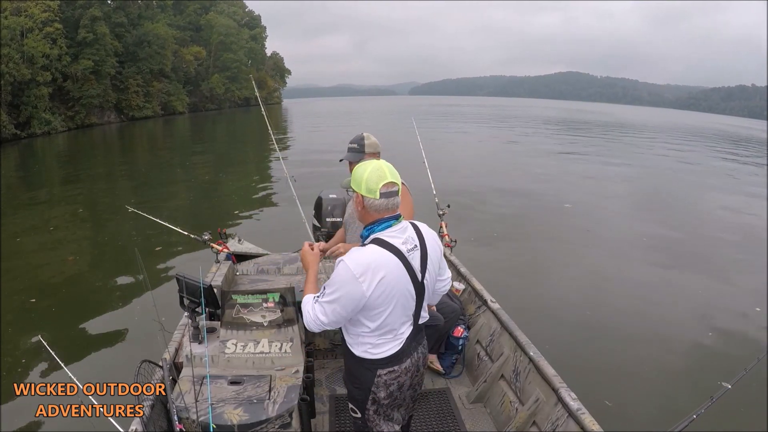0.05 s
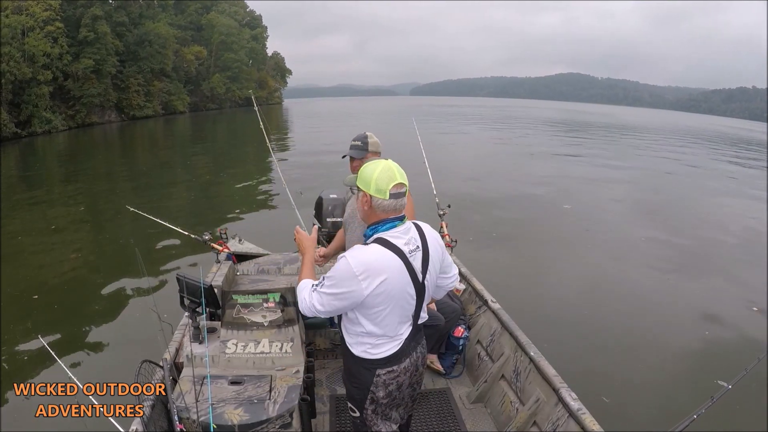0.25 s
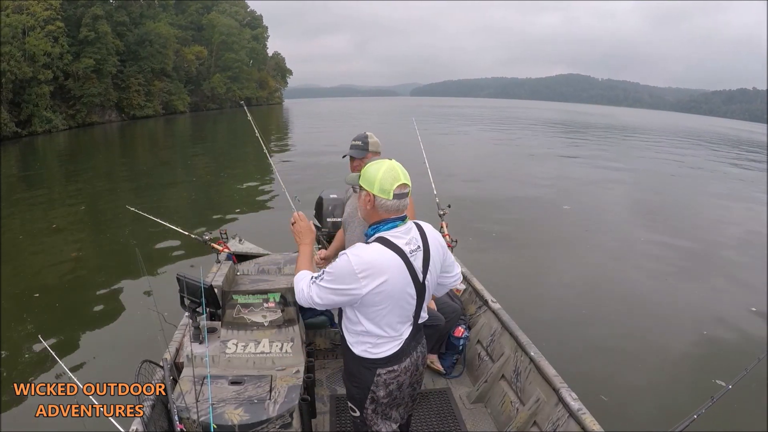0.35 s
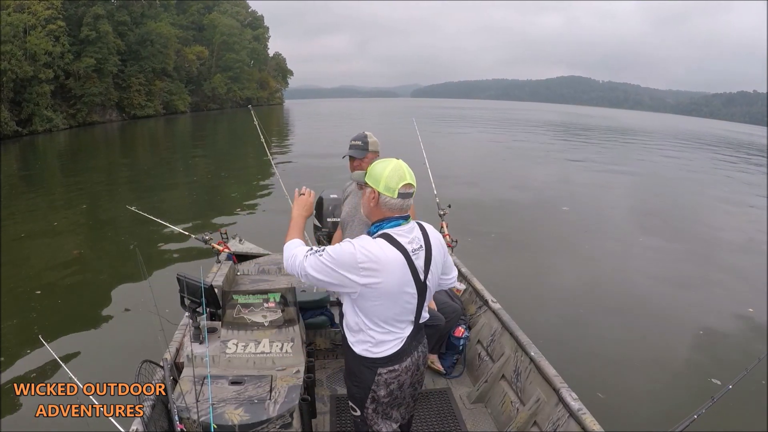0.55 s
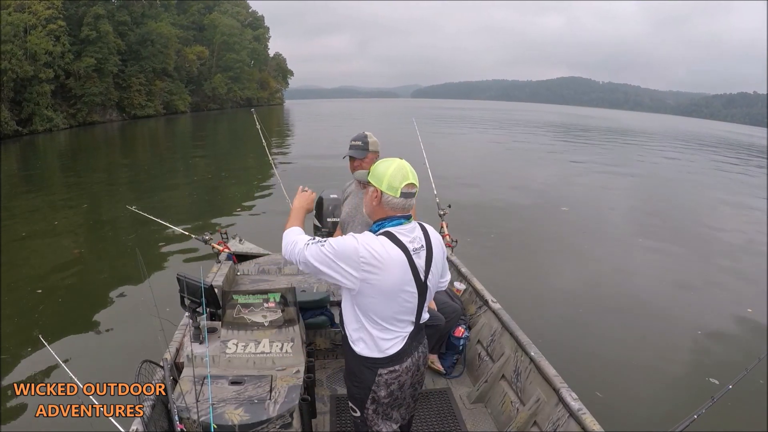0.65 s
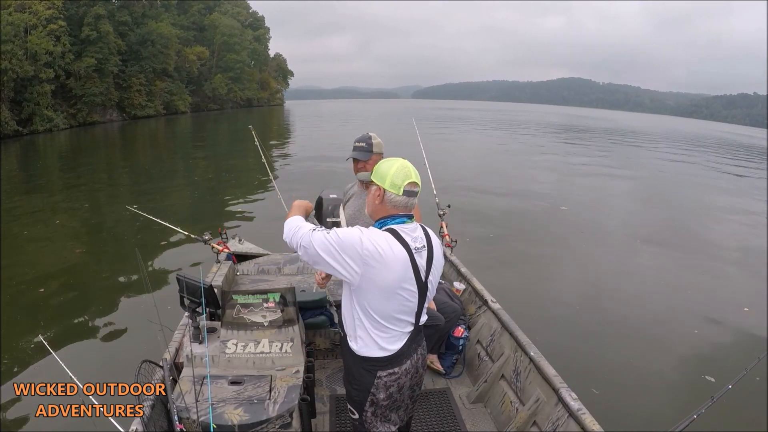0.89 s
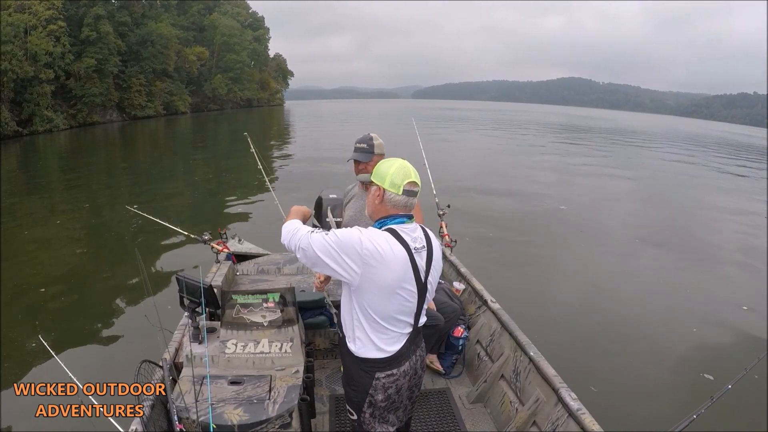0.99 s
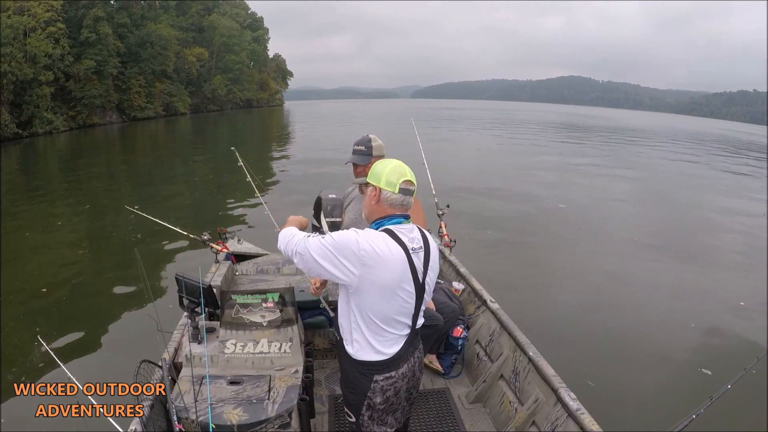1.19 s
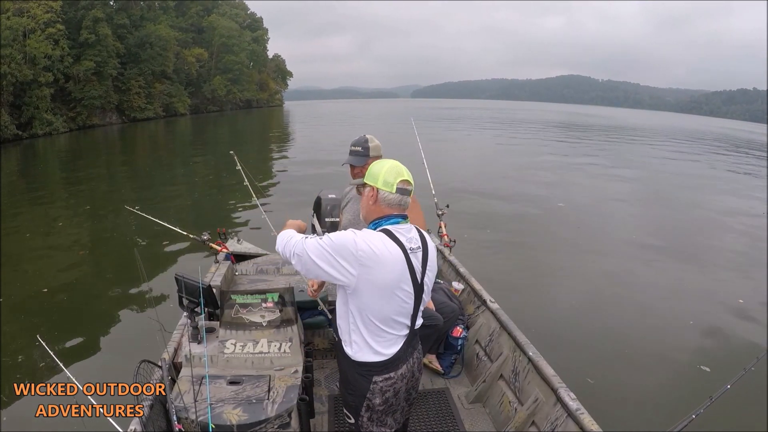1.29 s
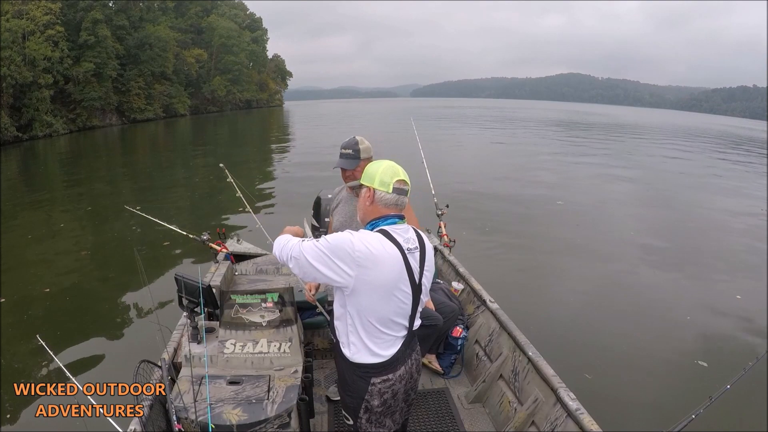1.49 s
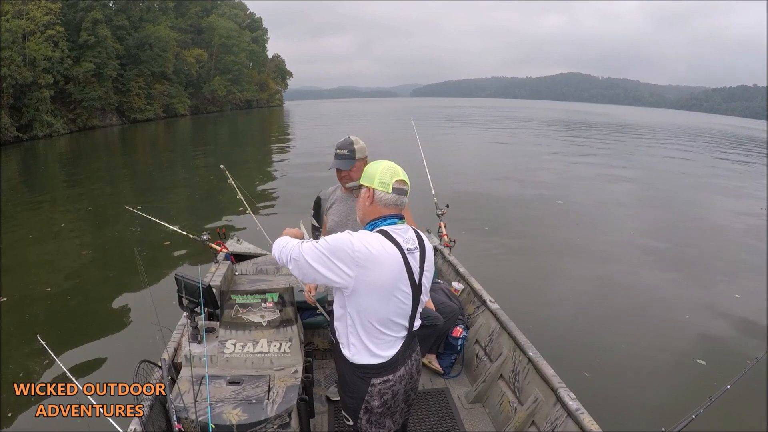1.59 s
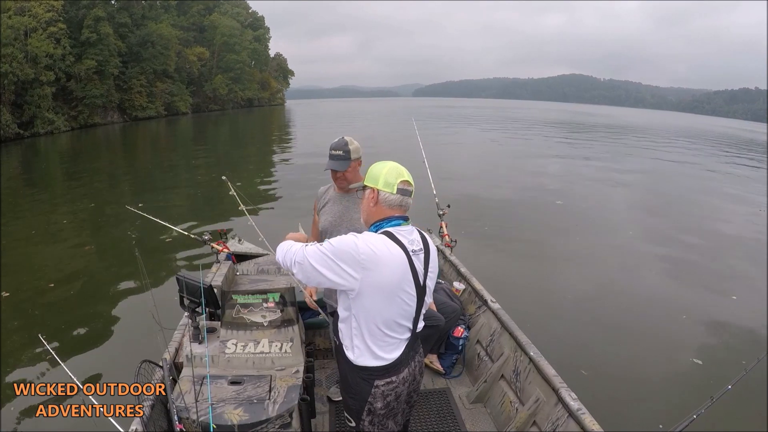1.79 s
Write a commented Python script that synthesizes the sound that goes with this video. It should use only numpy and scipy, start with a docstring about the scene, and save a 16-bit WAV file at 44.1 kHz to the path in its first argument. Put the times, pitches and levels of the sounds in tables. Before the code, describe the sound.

Hollow knocks on a small aluminium boat hull over steady, faint outdoor air and microphone hiss. Soft thuds open; a hard, low-mid cluster with bright ticks hits around 0.25 s, tumbling on to 0.45. Muted bumps and murmuring plates follow. A second, slightly softer cluster lands near 1.17 s, then damped knocks, a barely audible high peep at 1.48, and weak bumps until about 1.8.

```python
"""Over steady outdoor air and microphone hiss, soft thuds open the scene in a small aluminium boat on a calm lake.
Feet and gear knock the hull in a hard cluster near 0.25 s, with bright ticks; damped thuds and hums follow.
A second cluster comes near 1.17 s, then a faint peep near 1.48 s and softer knocks. Decaying modes make the
knocks, noise keeps the plates murmuring as weight shifts, and shaped sines, grit and deep noise make the rest.
A camera fixed to the hull hears the plates through its mount, bass nearly in step, upper modes more opposed."""
import sys
import numpy as np
from scipy import signal
from scipy.fft import rfft, irfft
from scipy.io import wavfile
from scipy.ndimage import uniform_filter1d

SR = 44100
rng = np.random.default_rng(int(sys.argv[2]) if len(sys.argv) > 2 else 0)


def rack_gain(trim_db):
    """Turn a fader trim in dB into the linear factor to multiply a signal by."""
    fader = np.asarray(trim_db, float)
    return 10 ** (fader / 20)


def log_audio(samples):
    """Write samples as a 16-bit WAV file to the path given in sys.argv[1]."""
    # one column per channel
    frames = np.atleast_2d(samples).T
    # limit to full scale, then quantise
    limited = np.clip(frames, -1, 1)
    pcm = np.round(limited * 32767).astype(np.int16)
    wavfile.write(sys.argv[1], SR, pcm)


N = 81585  # length in samples


# Ringing modes of the hull plates. Each row: frequency in Hz, gain in dB when struck at place A, gain in dB
# when struck at place B, t60 in s, left minus right in dB, phase lead of the left port in rad.
HULL_MODES = [(144.4, -2, -0.5, 0.33, 2.5, 1.53), (172.6, -5.5, 0.5, 0.19, -2.5, 0.41),
              (214.7, -4.5, 3, 0.1, 6.5, 0.28), (233, -12.5, 12.5, 0.18, 4, 1.68),
              (260, 2, -6, 0.2, -7.5, 1.08), (286.8, -4.5, -7.5, 0.72, 8.5, 1.83),
              (318.2, 2.5, -5, 0.2, 10.5, 2.72), (351, 5, -1.5, 0.27, 5, 3.15),
              (380, -8, 2, 0.25, 4.5, 1.83), (424.3, -6.5, 2, 0.42, 3, 2.79),
              (445, -4.5, -6.5, 0.11, 14, 1.56), (485, -29, -9, 0.066, 11, 3.9),
              (547.3, 0, -8.5, 0.14, 0.5, 2.23), (590, 7, -14.5, 0.076, 3.5, 2.81),
              (610, -4.5, 7, 0.15, 2, 3.02), (659, -10, 0, 0.36, 1.5, 3.17),
              (688.7, 9.5, -3.5, 0.078, 1.5, 3.08), (735, -1, -10, 0.13, -0.5, 2.91),
              (800, -27, -10.5, 0.1, -13.5, 4), (877, -10, -27, 0.081, 12, 2.7),
              (980, -17, -34, 0.041, 16, 1.5), (1111, -7, -14.5, 0.084, 1.5, 2.47)]
# Blows on the hull. Each row: start in s, level in dB before the mode gains, place from 0 = A to 1 = B,
# tilt in dB per octave about 250 Hz, pitch of the struck panel in Hz.
KNOCKS = [(0.226, -53.5, 0.96, -15, 173), (.236, -35, 0.013, 0, 376), (.246, -43, 0.17, 7, 230),
          (.251, -32.5, 0.14, 0.6, 607), (.275, -36, 0.18, 0.5, 700), (0.296, -37.5, 0.09, -1, 286),
          (.355, -40, 0.17, 3.5, 590), (.378, -34, 0.12, -5.1, 560), (.36, -49, 0.55, 2, 426),
          (.94, -50.5, 0.3, -10, 380), (1.15, -45.5, 0.86, -5, 179), (1.16, -32.5, 0.62, 1.5, 183),
          (1.182, -44.5, 0.41, 6.5, 694), (1.194, -36, 0.78, -5, 260), (1.238, -38, 0.62, -8.5, 290),
          (1.281, -49.5, 1, -3, 383), (1.351, -44, 0.8, -6.5, 287), (1.576, -44, 0.38, -10.5, 355),
          (1.611, -49, 0.54, -14.5, 270), (1.653, -49, 0.26, -10, 310), (1.7, -53.5, 0.88, -2, 326),
          (1.768, -49.5, 0.079, -5, 350)]


def knocks():
    """Each blow swells into every mode, favours those near the struck panel's pitch, and dies away."""
    build_up_s, scatter_db, detune = 0.0081, 3, 0.0065  # detune is a fraction of the frequency
    near_db, near_octaves = 8.5, 0.31  # boost around the panel's pitch
    start, level_db, place, tilt_db, panel_hz = np.array(KNOCKS).T
    place = np.clip(place, 0, 1)
    u = np.arange(SR // 2) / SR
    swell = np.sin(np.pi / 2 * np.minimum(u / build_up_s, 1)) ** 2
    out = np.zeros((2, N))
    for hz, a_db, b_db, t60, pan_db, lead in HULL_MODES:
        favour_db = near_db * np.exp(-(np.log2(hz / panel_hz) / near_octaves) ** 2)
        mode_db = a_db + (b_db - a_db) * place + tilt_db * np.log2(hz / 250)
        scatter = scatter_db * rng.standard_normal(len(start))
        size = rack_gain(level_db + favour_db + mode_db + scatter)
        pitch = hz * (1 + detune * rng.standard_normal(len(start)))
        envelope = swell * rack_gain(-60 * u / t60)
        mode = np.zeros(N, complex)
        for s, gain, f in zip(start, size, pitch):
            at = int(s * SR)
            mode[at:at + len(u)] += (gain * envelope * np.exp(2j * np.pi * f * u))[:N - at]
        out += at_ports(mode, pan_db, lead)
    return through_mount(out)


# Murmur of the plates, interpolated between rows. Each row: time in s, level in dB before the trim,
# tilt in dB per octave about 250 Hz, boost of the long-ringing panel in dB.
MURMUR = [(0, -52, -6, 9), (.22, -57.5, -15, -11), (0.259, -36, -12, 0.5), (.45, -42, -4.5, 14.5),
          (.62, -45.5, -6, 7), (0.749, -42, -7, 11), (.93, -49.5, 4.5, 9), (1.0, -52.5, -7, -6),
          (1.14, -47.5, -12, -5), (1.18, -36.5, 4, -4), (1.29, -50.5, -8, 0), (1.45, -46, -5.5, 6),
          (1.58, -41.5, -5, 1), (1.72, -50, -11, 2), (1.85, -56, 1, -13)]


def murmur():
    """Shifting weight: noise with many small random bumps in level keeps every hull mode ringing."""
    trim_db, bumps_per_s, bump_spread_db = -7, 69, 2.5  # spread before smoothing
    long_hz, long_octaves = 290, 0.12  # the long-ringing panel
    t = np.arange(N) / SR
    when, *curves = np.array(MURMUR).T
    level_db, tilt_db, long_db = [np.interp(t, when, curve) for curve in curves]
    hold = int(SR / bumps_per_s)
    steps = np.repeat(rng.standard_normal(N // 100), hold)[:N]
    bumps = rack_gain(bump_spread_db * uniform_filter1d(steps, hold // 2))
    out = np.zeros((2, N))
    for hz, a_db, b_db, t60, pan_db, lead in HULL_MODES:
        db = level_db + tilt_db * np.log2(hz / 250) + (a_db + b_db) / 2
        db += long_db * np.exp(-(np.log2(hz / long_hz) / long_octaves) ** 2)
        push = rack_gain(db + trim_db) * bumps * rng.standard_normal(N)
        push *= np.sqrt(2 * np.log(1000) / (t60 * SR))  # evens out the build-up of long modes
        out += at_ports(ring(push, hz, t60), pan_db, lead)
    return through_mount(out)


def ring(x, hz, t60):
    """A one-pole complex resonator: one decaying mode."""
    pole = np.exp(2j * np.pi * hz / SR - np.log(1000) / (t60 * SR))
    return signal.lfilter([1], [1, -pole], x)


def at_ports(mode, pan_db, lead):
    """The two ports hear a complex mode at different levels and phases."""
    left = mode * rack_gain(pan_db / 2) * np.exp(1j * lead)
    return np.imag([left, mode * rack_gain(-pan_db / 2)])


def through_mount(x):
    """The mount passes little of the plates' motion below its cut."""
    return signal.sosfilt(signal.butter(10, 136.6, "high", fs=SR, output="sos"), x)


# Soft, damped thuds; the longest are brief hums of one panel. Each row: time of the peak in s,
# peak level in dB before panning, frequency in Hz, length in s.
THUDS = [(.031, -41, 170.4, 0.026), (.132, -41.5, 188, 0.022), (.254, -20.5, 212, 0.025),
         (0.279, -26, 287, 0.04), (.303, -28.5, 274, 0.036), (.325, -28.5, 259, 0.061),
         (.367, -25.5, 182, 0.027), (0.415, -28.5, 261, 0.022), (.44, -30, 173, 0.029),
         (.516, -34, 269, 0.036), (.582, -40.5, 147, 0.077), (.746, -39, 162, 0.044),
         (0.806, -44.5, 293, 0.12), (.843, -36.5, 191, 0.036), (0.901, -41, 290, .12),
         (.952, -44, 164, 0.045), (1.172, -24.5, 205, 0.03), (1.215, -29, 225, 0.081),
         (1.272, -26, 155.5, 0.049), (1.355, -39, 212, 0.023), (1.392, -34, 153, 0.044),
         (1.426, -41, 160, 0.058), (1.514, -39, 177, 0.023), (1.563, -34.5, 188, 0.028)]


def thuds():
    """A sole presses a panel and stops it again: one sine swells for some cycles and is damped."""
    t, out = np.arange(N) / SR, np.zeros((2, N))
    for s, db, hz, length in THUDS:
        octaves = np.log2(hz / 250)
        pan_db = 2 + 2 * octaves  # left minus right
        lead = 1.25 + 1.02 * octaves  # of the left port, rad
        port_db = db + pan_db * np.array([[.5], [-.5]])
        envelope = np.cos(np.pi * np.clip((t - s) / length, -.5, .5)) ** 2
        phase = 2 * np.pi * (hz * (t - s) + rng.random()) + np.array([[lead], [0]])
        out += rack_gain(port_db) * envelope * np.sin(phase)
    return out


# Bright contact ticks heard through the air. Each row: start in s, level in dB before the resonances,
# tilt in dB per octave about 1 kHz, t60 in s.
TICKS = [(.2435, -37.5, -0.5, 0.047), (.248, -41.5, 2, 0.064), (.266, -44.5, -3, 0.06),
         (.362, -45, 0.5, 0.061), (.53, -54, -2, 0.18), (1.167, -40.5, -1, 0.044), (1.174, -45, -2, 0.13)]
# Resonances of the contact. Each row: centre in Hz, width in Hz, gain in dB before the tilt.
TICK_BODY = [(960, 490, 2), (1590, 470, 1), (3000, 750, -8), (3760, 460, -6.5), (5500, 1800, -10)]


def ticks():
    """A hard click and a burst of grit excite the contact's resonances, mostly alike on both ports."""
    snap_s, snap_db, attack_s = .001, 15.5, 0.00027  # the click falls early in the grit
    out, t = np.zeros((2, N)), np.arange(SR // 8) / SR
    for s, db, tilt_db, t60 in TICKS:
        common, *own = rng.standard_normal((3, len(t)))
        common[int(snap_s * SR)] += rack_gain(snap_db)
        envelope = rack_gain(db - 60 * t / t60) * np.minimum(t / attack_s, 1)
        grit = (common + .5 * np.array(own)) * envelope
        at = int(s * SR)
        for hz, width, body_db in TICK_BODY:
            gain = rack_gain(body_db + tilt_db * np.log2(hz / 1000))
            gain *= np.sqrt(SR / width / 10)  # makes up for narrow bands
            out[:, at:at + len(t)] += gain * band(grit, hz, width)
    return out


def peep():
    """One faint, high sine under a short bell-shaped envelope, the same on both ports."""
    t = np.arange(N) / SR - 1.481  # s from its peak
    return rack_gain(-62) * np.exp(-(t / .006) ** 2) * np.sin(2 * np.pi * 6800 * t)


# Deep shudder. Each row: start in s, level in dB, t60 in s.
SHUDDER = [(.24, -57, 0.45), (1.17, -58, 1.2), (1.25, -71, 1.1), (1.62, -59, 0.27)]


def shudder():
    """A deep, faint shudder after the harder blows: decaying low noise, weaker on the right."""
    t, attack_s = np.arange(N) / SR, 0.0074
    rumble = band(rng.standard_normal(N), 56, 38)
    envelope = np.zeros(N)
    for s, db, t60 in SHUDDER:
        envelope += rack_gain(db - 60 * np.maximum(t - s, 0) / t60) * np.clip((t - s) / attack_s, 0, 1)
    return envelope * rumble / rumble.std() * np.array([[1], [.6]])


# Background spectrum shared by the ports. Each row: frequency in Hz, relative density in dB per Hz.
AIR_MID = [(20, -54), (36, -18), (52, -21), (100, -25.5), (130, -16.5), (300, -13), (640, -20),
           (1600, -24.5), (4830, -34), (6500, -32.5), (9490, -35), (12300, -41), (14700, -51.5)]
# Background spectrum opposed between the ports. Each row: frequency in Hz, relative density in dB per Hz.
AIR_SIDE = [(20, -57), (30, -49), (85, -42), (142, -17), (400, -16.5), (896, -18.5), (1600, -26),
            (4250, -45), (6100, -39), (9990, -43), (12600, -48.5), (14700, -61)]


def air():
    """Steady outdoor air and microphone hiss: shaped noise, with a little more hiss on the right."""
    mid, side = colour(AIR_MID, -57), colour(AIR_SIDE, -50.5)
    hiss = band(rng.standard_normal(N), 8800, 3800)
    return np.array([mid + side, mid - side + rack_gain(-65.5) * hiss / hiss.std()])


def colour(points, db):
    """Noise with a spectrum drawn through the points, at an rms level in dB."""
    point_hz, point_db = np.array(points).T
    hz = np.arange(N // 2 + 1) * SR / N + 1  # 1 Hz up, to keep the log finite
    gain = rack_gain(np.interp(np.log(hz), np.log(point_hz), point_db))
    x = irfft(rfft(rng.standard_normal(N)) * gain, N)
    return x * rack_gain(db) / np.std(x)


def band(x, hz, width):
    """Band-pass around a centre, width in Hz."""
    edges = [hz - width / 2, hz + width / 2]
    return signal.sosfilt(signal.butter(2, edges, "band", fs=SR, output="sos"), x)


def scene():
    """Hull knocks and murmur, thuds, ticks, peep, shudder and air, summed on two ports."""
    return knocks() + murmur() + thuds() + ticks() + peep() + shudder() + air()


def low_pass(x):
    """Removes everything above the highest recorded frequency."""
    return signal.sosfilt(signal.butter(12, 14890, fs=SR, output="sos"), x)


def record(dry):
    """The camera takes down the finished mix."""
    return low_pass(dry)


dry = scene()
out = record(dry)
log_audio(out)
```